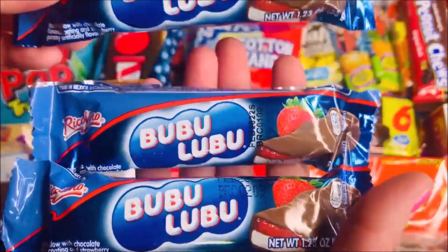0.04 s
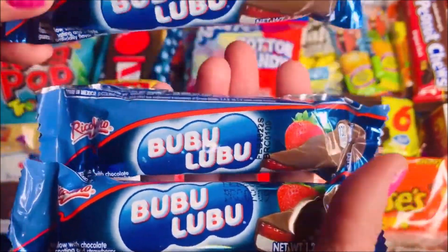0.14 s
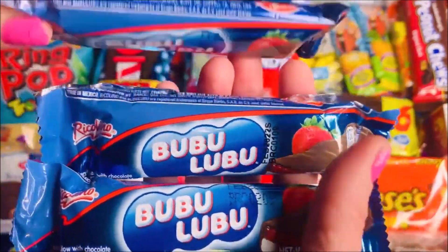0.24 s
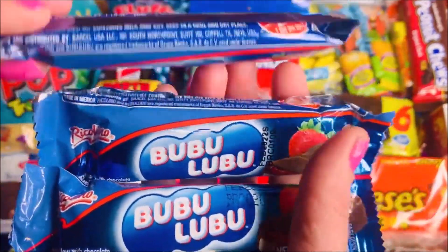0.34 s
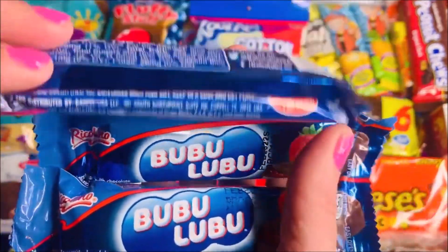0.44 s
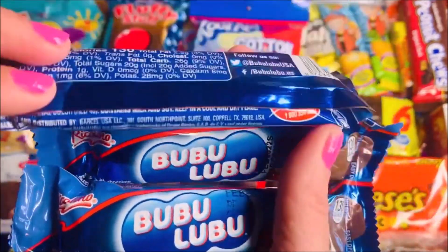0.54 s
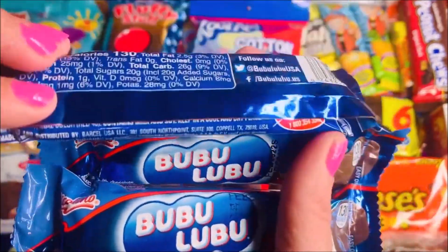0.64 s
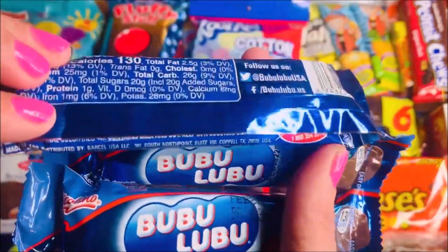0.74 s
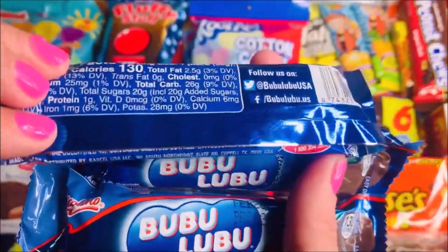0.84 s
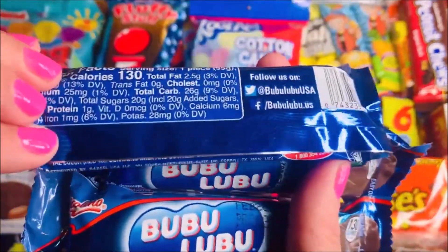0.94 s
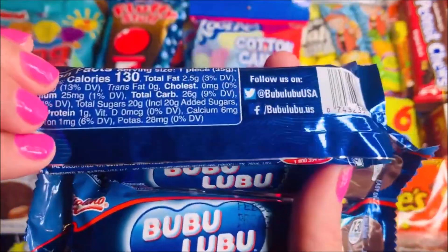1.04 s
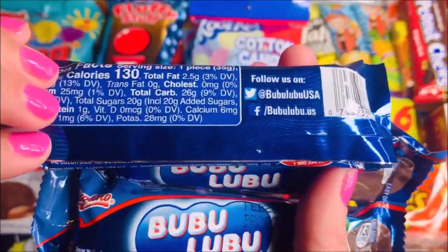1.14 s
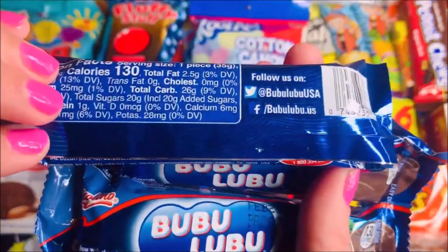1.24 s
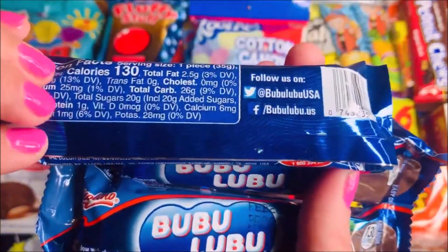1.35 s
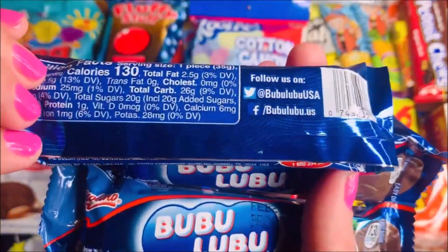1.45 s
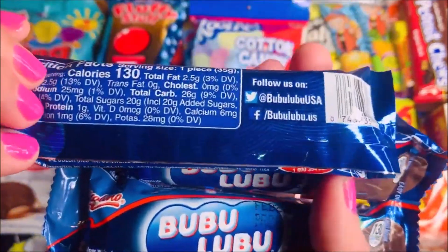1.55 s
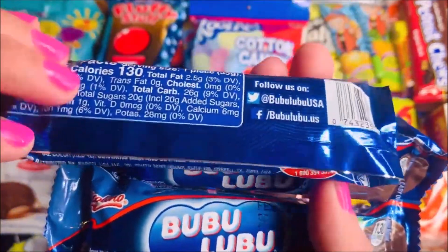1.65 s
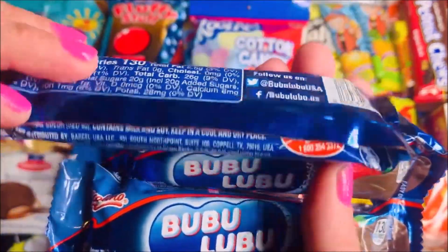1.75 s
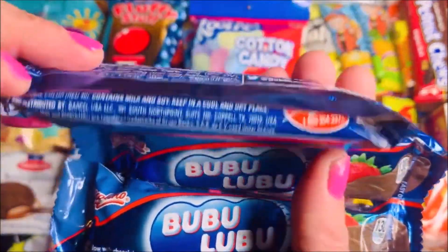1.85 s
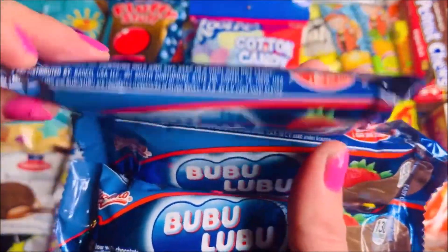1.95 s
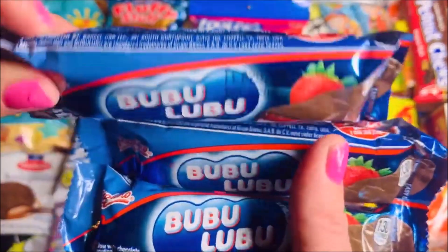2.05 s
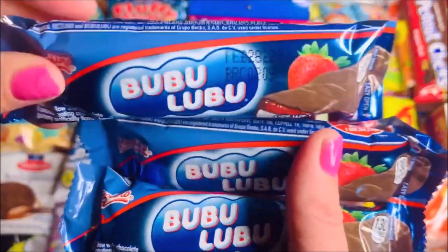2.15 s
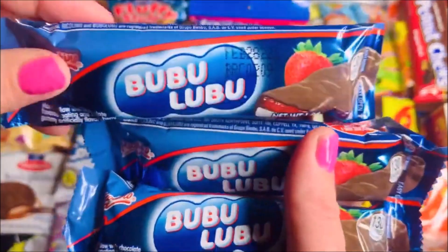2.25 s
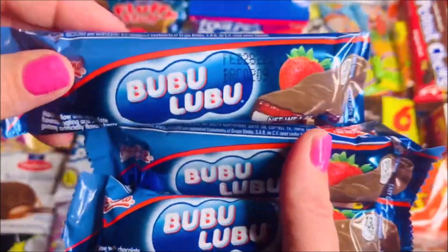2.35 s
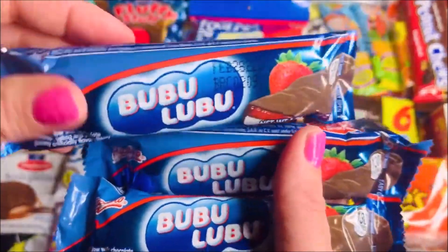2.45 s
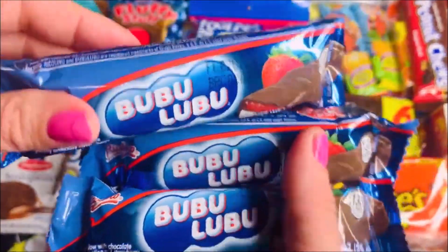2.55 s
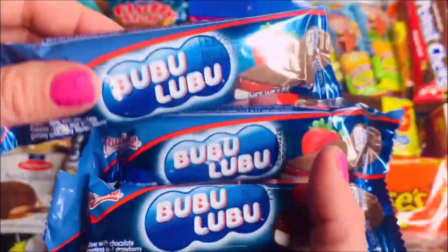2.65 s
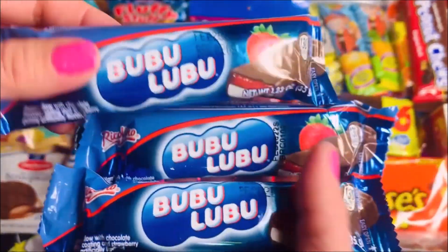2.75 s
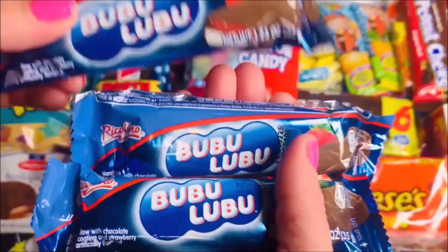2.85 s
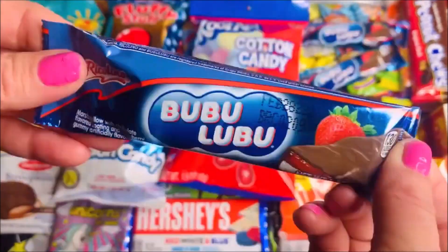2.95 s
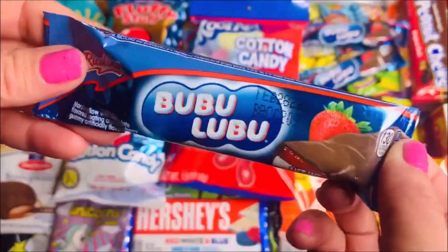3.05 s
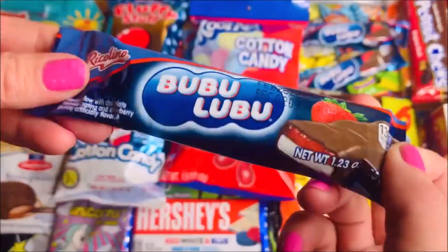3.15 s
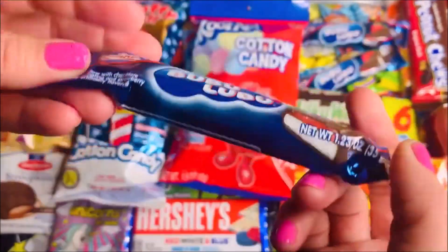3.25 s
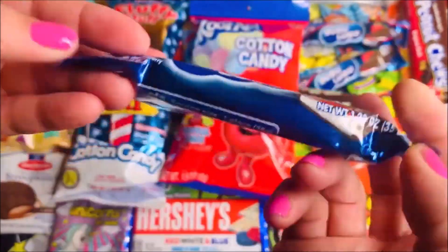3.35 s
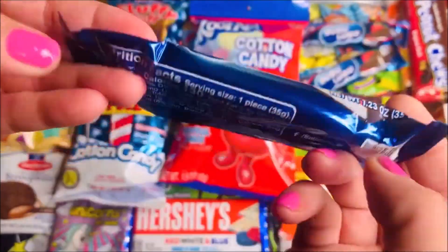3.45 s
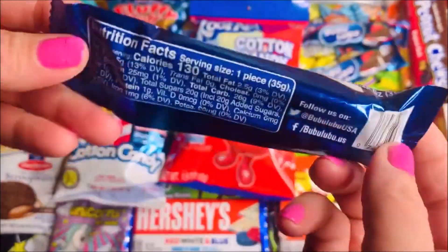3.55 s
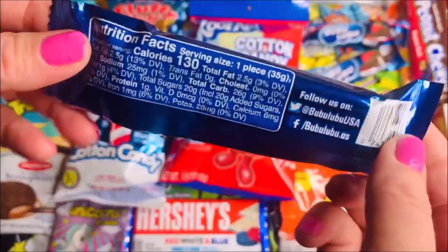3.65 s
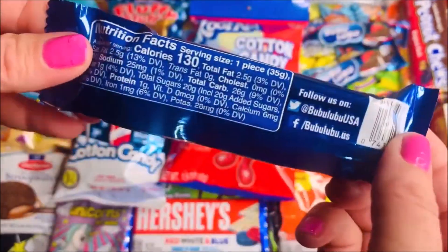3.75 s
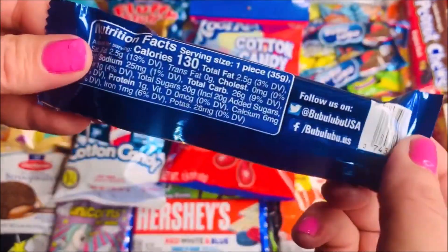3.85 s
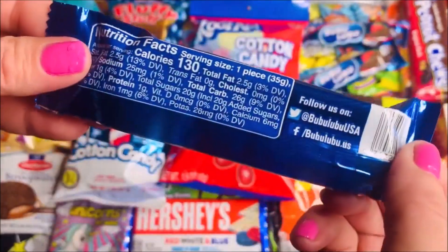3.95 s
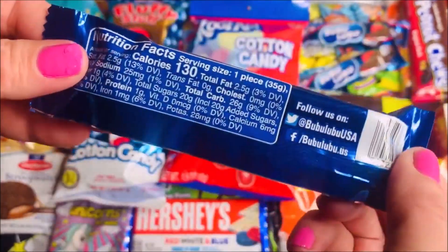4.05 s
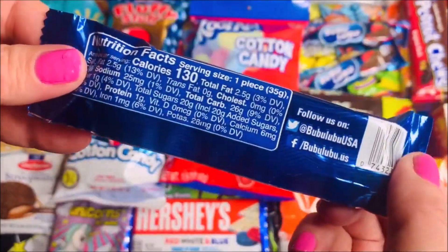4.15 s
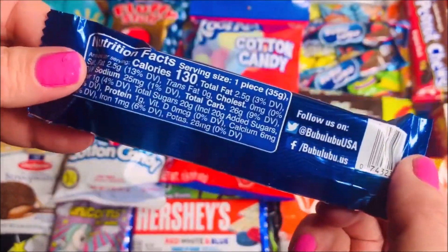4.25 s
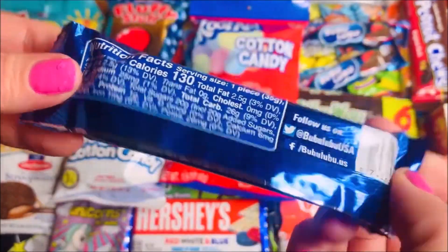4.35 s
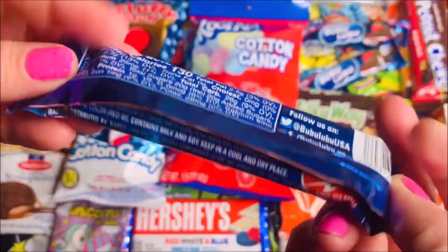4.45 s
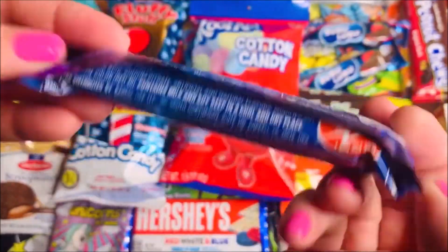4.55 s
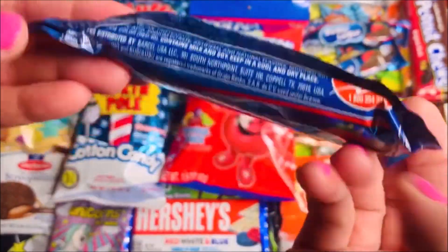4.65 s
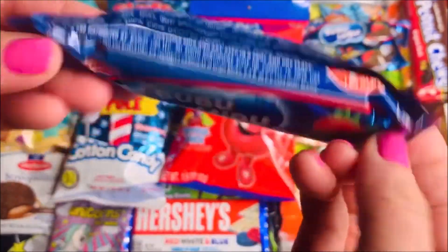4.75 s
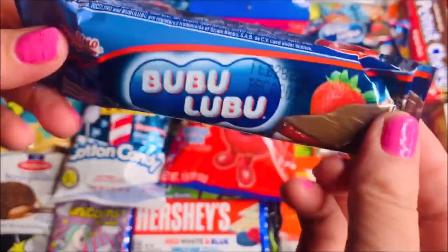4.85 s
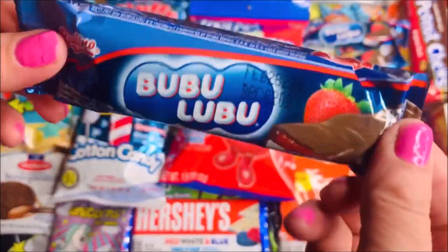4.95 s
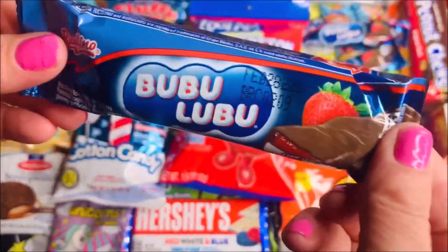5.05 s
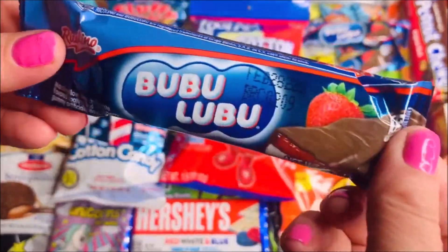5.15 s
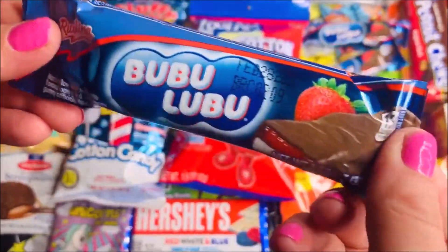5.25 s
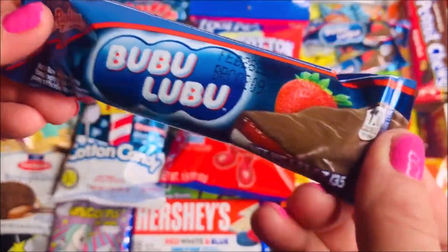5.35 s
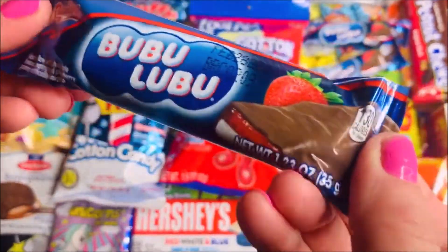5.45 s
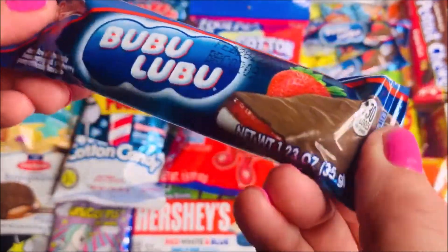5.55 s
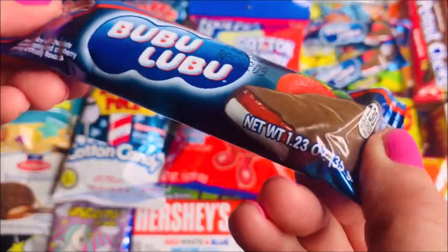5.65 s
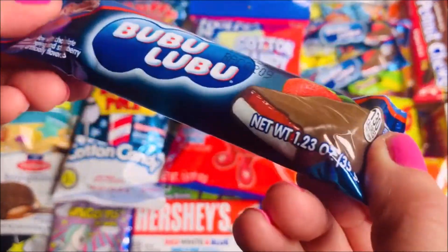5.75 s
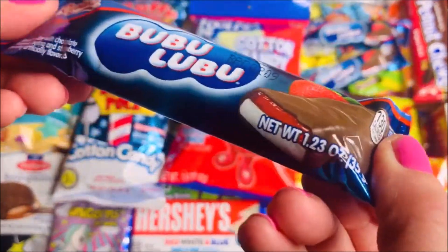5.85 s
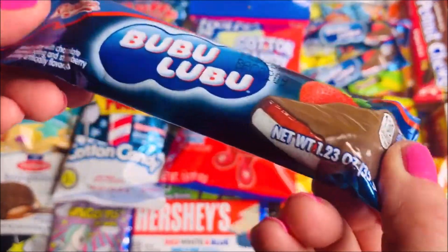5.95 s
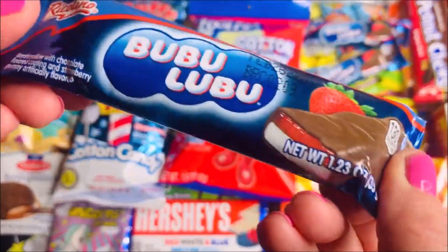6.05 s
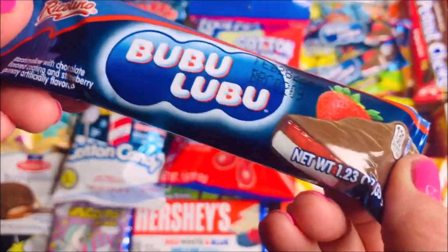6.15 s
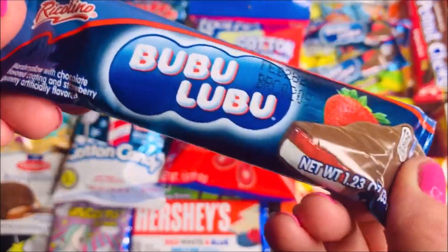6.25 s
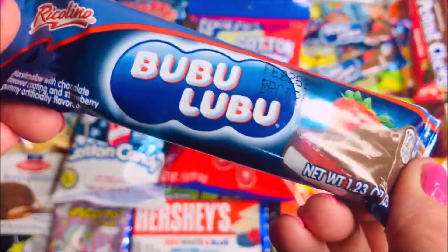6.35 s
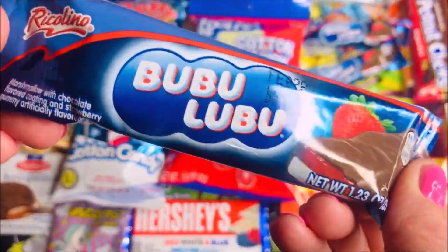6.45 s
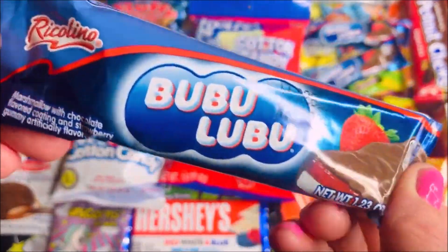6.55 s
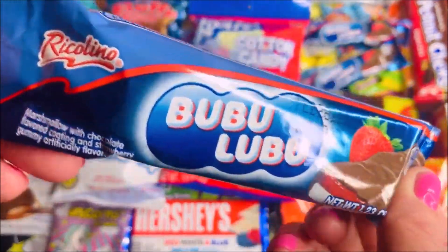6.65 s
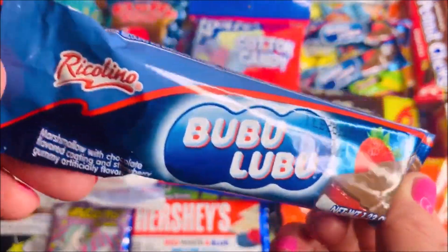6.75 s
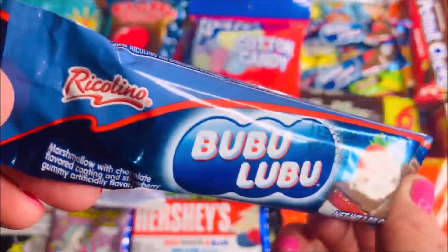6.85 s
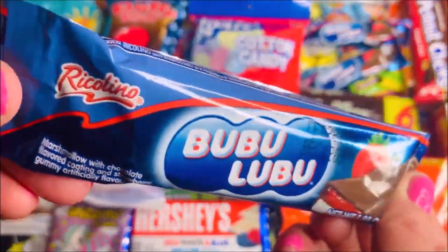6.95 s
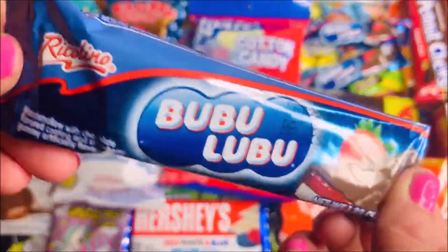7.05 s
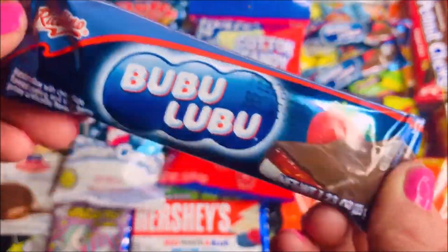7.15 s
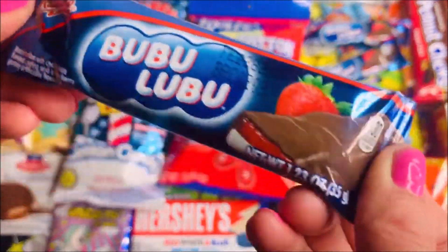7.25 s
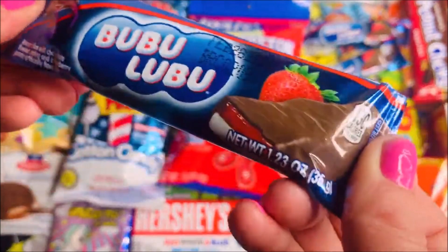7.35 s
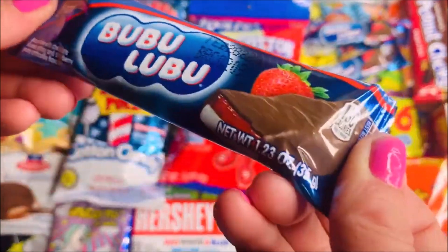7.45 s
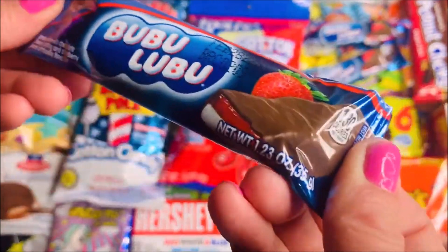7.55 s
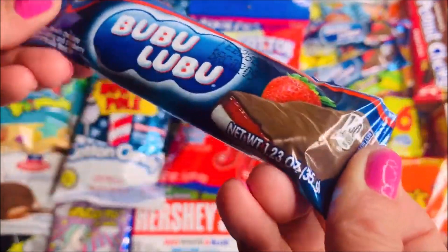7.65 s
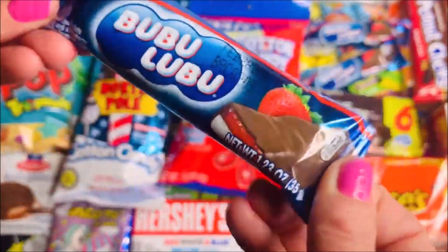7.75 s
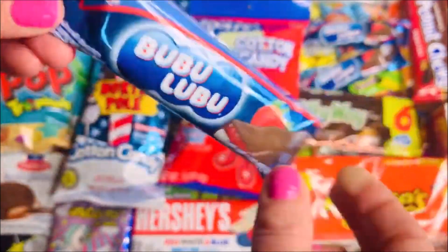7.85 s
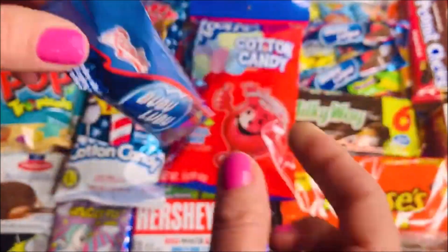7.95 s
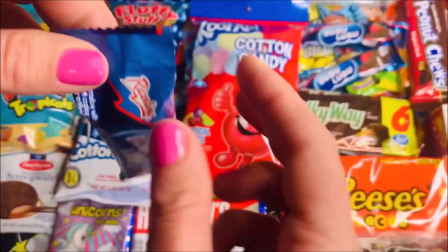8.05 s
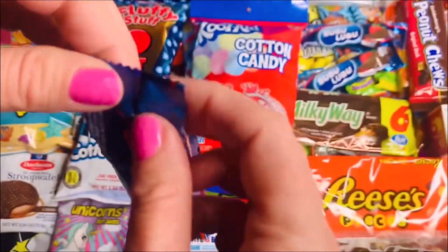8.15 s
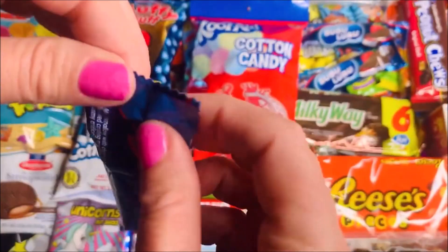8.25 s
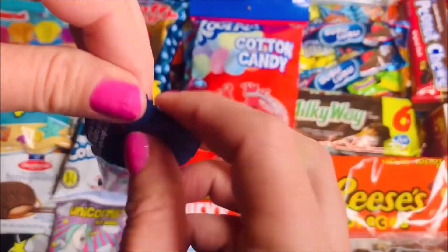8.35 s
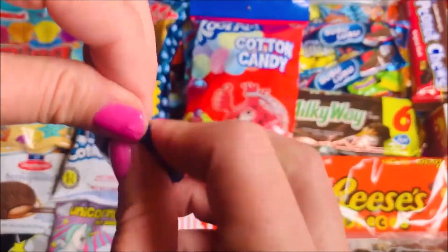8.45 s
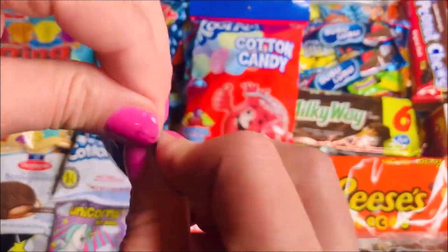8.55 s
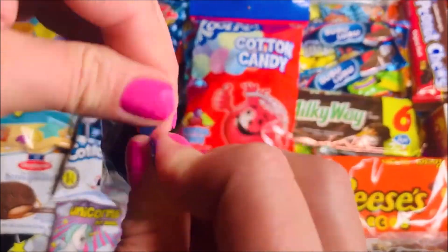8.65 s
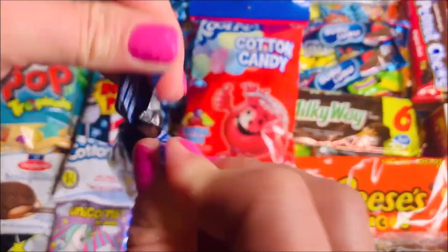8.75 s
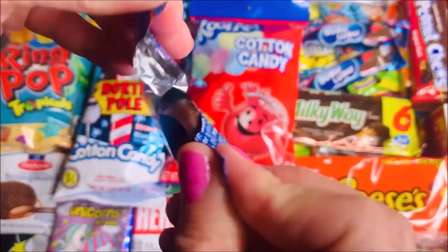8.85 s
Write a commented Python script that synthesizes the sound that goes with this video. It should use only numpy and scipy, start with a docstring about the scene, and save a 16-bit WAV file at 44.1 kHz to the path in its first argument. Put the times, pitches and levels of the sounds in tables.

```python
"""Stiff film on plastic-wrapped candy bars snaps and crackles as hands turn them close by.
Each crease gives way in quick slips that ring the film, an air pocket and a sharp edge.
Small ticks follow the snaps, with a fine rustle, small pops and soft sine knocks of the bars.
A small quiet room answers with close echoes and a short tail made of scattered clicks.
Behind it lie a faint low drone of wavering sines and a steady rumble and hiss of shaped noise."""
import sys
import numpy as np
from scipy import signal
from scipy.fft import rfft, irfft, next_fast_len
from scipy.io import wavfile
from scipy.ndimage import map_coordinates

SR = 44100
rng = np.random.default_rng(int(sys.argv[2]) if len(sys.argv) > 2 else 0)


def persist_wave(psi):
    """Save psi, clipped to +-1, as 16-bit WAV."""
    counts = np.round(np.clip(psi, -1, 1) * 32767).astype(np.int16)
    wavfile.write(sys.argv[1], SR, np.atleast_2d(counts).T)


N = 392049  # length in samples

# Creases that snap. A facet is a flat piece of film; levels are before the room and overall tone curve.
# Columns: start_s, facet_energy_db, facet_centre_hz, pocket_over_facet_db, pocket_centre_hz,
# edge_over_facet_db
CREASE_SNAPS = [(0.033, -29, 4530.0, 7, 2110, -10), (0.0862, -18, 4900, -14, 1970, -3.5),
                (0.1446, -28.0, 4520.0, 2.0, 2320, -3), (0.152, -20, 6620.0, -5, 2260, -3),
                (0.1755, -20, 4930.0, -4, 2640, -28.0), (0.218, -37.5, 3790.0, 16.5, 1920.0, -12.0),
                (0.2320, -12, 5700, -14, 2030, -2.5), (0.2715, -11.5, 5630, -14, 2620, 0),
                (0.3311, -24.5, 7150, -5, 2450, 2), (0.4555, -24, 4060, 0.5, 2170, -21.0),
                (0.5304, -20.5, 5730, -5, 2470, 4), (0.5973, -19, 5640, -23, 2600, -7),
                (0.695, -22.5, 5360, 4, 1980, -5), (0.7818, -29, 5160, -0.5, 2200.0, -4),
                (0.826, -26.5, 7000, -9, 2070.0, -1), (0.875, -29, 5570, -1.5, 2170, -7),
                (0.9229, -31, 5730.0, 0, 2530.0, -9.0), (0.9355, -8, 5670, -7.5, 2280, -5),
                (0.9734, -9.5, 5850, -39, 2720.0, -4), (1.0544, -21.5, 4880.0, 1.5, 2740, -9),
                (1.248, -36, 6140.0, 2.5, 2150, 1), (1.394, -33.5, 4050, 5.5, 1850, -36.0),
                (1.5134, -13.5, 6800, -1.5, 2420, -6), (1.6134, -16, 7640, -12, 2160.0, 2),
                (1.625, -22, 7940, -5, 1970.0, 0), (1.701, -18.5, 4300, -8, 2080.0, -23),
                (1.785, -20, 6000, -0.5, 2320, 3), (1.8493, -16, 6750, -5, 2440, -5),
                (1.8631, -22, 6030, -5.5, 2280, -8), (1.8890, -12.5, 6090.0, -7, 1830, 1),
                (1.924, -9.5, 6000, -2, 2630, 0.5), (2.0668, -9, 7400, -3.5, 2570, -4),
                (2.0848, -15, 5100, -15, 2560, 1.5), (2.208, -31, 6970.0, -2.5, 2100, 3),
                (2.2562, -28, 4340, 4, 2780, 2), (2.272, -23.5, 7100, -6.0, 2130, -24),
                (2.313, -22, 7020.0, -8.5, 1590, -0.5), (2.3347, -17, 7350, -8.5, 1750, 0),
                (2.476, -31.5, 6630.0, 4.5, 1850, -5), (2.5764, -13.5, 6640, -7.5, 1960, -4),
                (2.6195, -15.5, 7200, -11.5, 1880, 2), (2.641, -18.5, 7700, -2.5, 1860, 4),
                (2.679, -18, 5900, -7.5, 2700, -7), (2.7312, -29, 5560, 3, 2700, -17),
                (2.805, -25.5, 6460, -2.5, 2100, -10.0), (2.839, -23, 5760, -4, 2600.0, -1),
                (2.877, -10, 5250, -5, 2740, -3), (2.9033, -24.5, 3830.0, 7.5, 2330, -1),
                (2.936, -24, 5310.0, 4, 2640, -11), (2.9698, -24, 6920.0, -2, 2220.0, -5),
                (3.0133, -16, 5740, -12, 2260.0, -3.0), (3.026, -22, 5950.0, 6, 2840, 1),
                (3.1054, -15, 7030.0, -16, 2300.0, -15), (3.112, -20, 6510.0, 1, 2630, 9.5),
                (3.1185, -12.5, 7060, -12, 2320, -19), (3.143, -25.5, 5680.0, 8, 2500, -9),
                (3.1669, -19.5, 3880, 0, 2540, -19), (3.2178, -23.5, 5680.0, 0.5, 1540, -10.0),
                (3.234, -20.5, 7800, -0.5, 2240.0, 2.5), (3.2983, -15.5, 4660.0, -2.5, 2600, -7),
                (3.348, -26, 7130.0, 1, 2200.0, 6), (3.3752, -14.5, 6250, -4, 1980, -0.5),
                (3.43, -22, 7060, -26, 2020.0, 6), (3.4677, -18, 5600, -3.5, 1580, -9.0),
                (3.5165, -12, 6900.0, -7, 2310, -5), (3.57, -27, 5150, 0.5, 1720.0, -12),
                (3.649, -26, 5000, 1, 1780, -3), (3.6712, -18.5, 5040, 2, 2100, -3),
                (3.7372, -30, 5730.0, 3.5, 2110.0, -9), (3.8763, -26, 6830, -4, 2470.0, -6),
                (3.8953, -18.5, 5900, 0, 2510, 1), (4.0147, -22, 4500, -1, 2170, -15),
                (4.0869, -16, 6500, -6.5, 1950, 2.5), (4.2812, -11.5, 6070, -7.5, 1840, -2),
                (4.302, -3.5, 5540, -6.5, 2440, -3.5), (4.3478, -5.5, 6700, -9, 2200, -3.5),
                (4.379, -12.0, 5630, -3.5, 2460.0, 0), (4.481, -24, 5820.0, -3, 2370.0, -3),
                (4.5039, -15, 6960, -5, 2610, -2.5), (4.567, -26, 4840.0, 5, 2140, -13),
                (4.5918, -15, 6960, -5, 2350, -5), (4.625, -6.5, 4350, -4.5, 2700, -9),
                (4.644, -31, 4820.0, 5, 2320.0, 9), (4.7418, -9, 7700, -10.5, 2150, -24),
                (4.754, -7, 7700, -31, 2220.0, 2.5), (4.7914, -9.5, 5860, -10.5, 2300, -2),
                (4.8160, -9, 7350, -7, 2400, 4), (4.8308, -13.5, 4900, -5.5, 2020, -12),
                (4.92, -17.5, 5870, -19, 2140.0, -4), (4.9439, -14.5, 6030, -7, 2110.0, -1),
                (4.9516, -12.5, 6870.0, -9, 2200.0, 7), (5.0196, -15.5, 5160, -1.5, 2770, -4.5),
                (5.0529, -15, 6300, -5, 2370, -8), (5.1236, -20.5, 8300, -2.5, 2720, 4.5),
                (5.2396, -19.5, 4400, -4, 1550, -21), (5.282, -23, 5400, -26, 1860.0, -6),
                (5.3808, -23.5, 3900, -1.5, 2690, -21), (5.5684, -43, 5130, 10, 1460.0, -16),
                (5.7377, -38.5, 3560, 8, 2250, -18), (5.769, -36, 3660.0, 5.5, 2360.0, -28.0),
                (5.779, -25, 5300, -3, 1880, -30), (5.8522, -34, 3630, 1, 2120, -26),
                (5.9387, -17.0, 5540, -1, 1610, -13), (5.9602, -9.5, 5200, -6, 1750, -6),
                (6.0522, -15.5, 6000, -11, 2320, -8.5), (6.124, -22, 5500, -8, 1670, -6),
                (6.3647, -41, 4260, 5, 2480, -20.0), (6.4233, -31, 6870, -32, 1620.0, -7.0),
                (6.433, -24.5, 5670, -1.5, 1890, -2.5), (6.5652, -7.5, 6250, -9.5, 2540, -5.5),
                (6.7091, -46, 5170.0, 3, 1920.0, -14), (6.8674, -26, 3740, 4.5, 2400, -12),
                (6.991, -21, 5800, -5, 1720, -18), (7.0317, -12.5, 7200, -10, 2120.0, -12.0),
                (7.0538, -31, 7170.0, -12, 2180.0, 2), (7.0805, -20.5, 5660.0, -4.5, 2200.0, 0),
                (7.1387, -22, 5690.0, -5, 2090.0, -8), (7.1824, -18, 8600, -7, 2230, 4),
                (7.298, -28, 3740, -3.5, 1750, -6), (7.444, -33, 3930.0, 4, 1940, -18),
                (7.4617, -28, 4800, -3, 2200, -24.0), (7.4761, -24, 5700, -1, 2250, -8),
                (7.4966, -27, 4690.0, 2.5, 2130, -20), (7.539, -44, 4000, 15, 1290, -15),
                (7.5565, -17, 5230, 1.5, 1850, -24), (7.6301, -13, 6840, -9, 1990, -4),
                (7.671, -20.5, 5070.0, -2.5, 2230, -10.0), (7.6955, -16, 5200, -4.5, 1700, -12.0),
                (7.7248, -5, 6370, -7.5, 2200, -1), (7.7515, -13.5, 7450, -24, 2100.0, -4),
                (7.877, -15.5, 5200, -25, 2570, -7), (7.89, -15, 5530, 3.5, 2000, -3),
                (7.8998, -15.5, 6000, -13, 2400, -1.5), (7.9054, -11, 7000, -7.5, 2650, -16),
                (7.9588, -22, 4700, -4.0, 2160, -11.0), (7.999, -12, 6200, -10, 2140, -0.5),
                (8.037, -33, 5000, 5, 1880, 4), (8.0862, -38, 5830, 0.0, 1970.0, -12),
                (8.101, -20, 6380.0, 2, 1800, -6), (8.1812, -18.0, 6200, -1, 1820, -0.5),
                (8.2492, -23.5, 5560.0, -5, 2420.0, -2), (8.2948, -6, 5440, -9, 2660, -8),
                (8.331, -12, 6360, -3.5, 2560, 1.5), (8.397, -5.5, 6340, -30, 2550, -4.5),
                (8.4897, -28.5, 7630.0, -14.0, 2030.0, 16), (8.498, -5, 7600, -6, 1760, -21),
                (8.5274, -6, 8500, -18, 2500, 3.5), (8.54, -15, 6200, -19, 2120.0, -4),
                (8.561, -14, 6270.0, 0, 1920, -9.0), (8.5741, -14, 5700.0, -5, 2280.0, -6),
                (8.623, -19.5, 4300, 4, 1770, 6), (8.627, -15.5, 6640.0, 0.5, 1900, -10),
                (8.6371, -10, 6000, -21, 1990.0, -1.5), (8.657, -19, 7110.0, -16, 2110.0, 4),
                (8.6749, -24.5, 4610.0, 2, 1500, -2), (8.685, -9, 5950, -4.5, 1810, -5),
                (8.708, -29.5, 4490.0, 6.5, 2390, -7.0), (8.75, -13, 5670, 5.5, 1940, 0),
                (8.7997, -12.5, 6900, -1.5, 1970, 2), (8.83, -7.5, 6230, -5.5, 2480, -1),
                (8.8583, -10, 5780.0, -3, 2450.0, -5), (8.871, -17, 6030, -9, 2750, -7)]
# Tone balance of the quiet room's noise. Columns: pitch_hz, relative_level_db (per Hz)
AIR_SPECTRUM = [(12, -50), (20, -5), (60, -9.5), (151, -1.5), (237, -13.5), (361, -11.5), (888, -27.5),
                (1510, -26), (4790, -42), (15200, -47), (16500, -54)]
AIR_LEVEL_DB = -59.5  # overall rms level before the overall tone curve
# Tones of the lasting drone, gliding from 1 s before the scene to 1 s after it.
# Columns: start_pitch_hz, end_pitch_hz, typical_rms_level_db, waver_rms_hz
DRONE_TONES = [(55.7, 59, -74.5, 1.5), (120, 118, -62, 2.27), (147.3, 141, -58, 0.79),
               (152.3, 153, -69.5, 3.53), (181.2, 160, -68, 1.7), (215.6, 209, -73.5, 2.26)]
# Time for the room's tail to fall 60 dB. Columns: pitch_hz, fall_time_s
ROOM_DECAY = [(500, 0.21), (1500, 0.16), (3500, 0.24), (6000, 0.2), (10000, 0.17), (13500, 0.08),
              (16000, 0.031)]
# Single echoes off the table and walls. Columns: nominal_delay_ms, level_db
CLOSE_ECHOES = [(2.4, -15), (4.6, -12), (8.6, -12)]
# Overall tone colour: slightly bright, falling steeply above 15.7 kHz. Columns: pitch_hz, gain_db
OVERALL_TONE = [(20, -1.5), (13500, 4), (15700, -2.5), (16000, -19), (17000, -43)]
TOP_EDGE_HZ = 16900  # the final filter removes sound above about here
PLACES = 8  # places on the film, each with its own room answer
# Soft knocks of the bars against fingers and each other.
# Columns: start_s, level_before_fade_db, pitch_hz
BAR_KNOCKS = [(0.694, -48, 740), (2.623, -44, 514), (2.874, -38, 342), (3.518, -40.5, 292),
              (3.672, -37.5, 337), (4.279, -33.5, 303), (4.829, -38, 477), (8.626, -38, 730)]
# Thin tones that sink, come and go.
# Columns: start_s, end_s, start_pitch_hz, end_pitch_hz, typical_rms_level_db
THIN_TONES = [(.8, 3.1, 339, 331, -70), (3.4, 7.3, 323, 313, -67), (5.1, 6.9, 285, 282, -69)]
# How busy the hands are; this scales the rustle and small pops. Columns: time_s, relative_level_db
HAND_ACTIVITY = [(0.0, -56.5), (0.99, -58.5), (1.36, -66.5), (1.78, -51.5), (2.28, -54.5), (3.04, -48),
                 (3.62, -50), (4.33, -79), (4.48, -51.5), (4.93, -52.5), (5.59, -75.5), (5.89, -68.5),
                 (6.91, -79), (7.1, -53.5), (7.45, -69), (7.77, -52), (8.24, -52), (8.74, -52)]


def gain_of(db):
    """Turns decibels into a multiplier for the wave."""
    return 10 ** (np.asarray(db) / 20)


def evened(x):
    """Scales a signal to an rms level of 1."""
    return x / np.sqrt(np.mean(x ** 2) + 1e-20)


def read(points, hz):
    """Reads a curve between its points, along a logarithmic pitch scale."""
    point_hz, value = np.transpose(points)
    return np.interp(np.log(hz + 1), np.log(point_hz + 1), value)


def add(mix, start_s, sound):
    """Adds a sound at its start time, cutting off what runs past the end."""
    part = mix[round(start_s * SR):][:len(sound)]
    part += sound[:len(part)]


def coloured(x, points):
    """Makes each pitch stronger or weaker, following a curve of gains in dB."""
    size = next_fast_len(len(x))
    gain = gain_of(read(points, np.fft.rfftfreq(size, 1 / SR)))
    return irfft(rfft(x, size) * gain, size)[:len(x)]


def air():
    """Steady rumble and hiss of the quiet room: random noise with a shaped tone balance."""
    noise = coloured(rng.standard_normal(N), AIR_SPECTRUM)
    return gain_of(AIR_LEVEL_DB) * evened(noise)


def drift(per_s):
    """A slow random curve of rms 1, drawn smoothly through per_s random points a second."""
    knots = rng.standard_normal(int(N / SR * 40) + 2)
    position = np.arange(N) / SR * min(per_s, 40)
    return evened(map_coordinates(knots, [position], order=3))


def tone(start_hz, end_hz, db, waver_hz, start_s=-1, end_s=N / SR + 1):
    """A low sine whose pitch glides and wavers while its level swells a little."""
    t = np.arange(N) / SR
    present = np.clip(np.minimum(t - start_s, end_s - t) / .3, 0, 1)  # 0.3 s fades
    pitch_hz = np.interp(t, [start_s, end_s], [start_hz, end_hz]) + waver_hz * drift(8)
    turns = np.cumsum(pitch_hz) / SR
    level = gain_of(db + 1.44 * drift(6.4))
    return present * level * np.sqrt(2) * np.sin(2 * np.pi * turns)


def hum():
    """The lasting drone and the thin tones above it, built by adding separate sines."""
    thin = sum(tone(*row, .15, start_s, end_s) for start_s, end_s, *row in THIN_TONES)
    return sum(tone(*row) for row in DRONE_TONES) + thin


def room(x):
    """Close single echoes, a quick scatter off nearby things, and a tail whose bands die at their own speeds."""
    # One click of random sign falls somewhere in every 20 samples.
    clicks = np.zeros(SR // 2)
    at = np.arange(44, SR // 2 - 20, 20)
    clicks[at + rng.integers(0, 20, len(at))] = rng.choice([-1., 1.], len(at))

    hz, t, bands = signal.stft(clicks, SR, nperseg=128)
    fade = gain_of(-60 * t / read(ROOM_DECAY, hz)[:, None])
    tail = signal.istft(bands * fade, SR, nperseg=128)[1]

    scatter_fade_db = -60 * np.arange(len(clicks)) / SR / 0.021  # falls 60 dB in 21 ms
    scatter = clicks * gain_of(2.76 * rng.exponential(1, len(clicks)) + scatter_fade_db)

    answer = gain_of(-3.0) * tail[:len(clicks)] / np.linalg.norm(tail)
    answer += gain_of(-11) * scatter / np.linalg.norm(scatter)
    for (ms, db), shift in zip(CLOSE_ECHOES, rng.uniform(.8, 1.15, len(CLOSE_ECHOES))):
        add(answer, shift * ms / 1000, gain_of([db]))
    return signal.oaconvolve(x, answer)[:N]


def knocks():
    """Each knock is one dull, short sine with a soft start, falling 60 dB in 25 ms."""
    out = np.zeros(N)
    t = np.arange(round(.05 * SR)) / SR
    for start_s, db, hz in BAR_KNOCKS:
        level = gain_of(db - 60 * t / 0.025) * np.minimum(t * hz, 1)
        add(out, start_s, level * np.sin(2 * np.pi * hz * t))
    return out


def ring(hz, decay_ms, turn):
    """A part of the pack rings and dies: a fading sine that rises over its first cycle."""
    t = np.arange(round(.012 * SR)) / SR
    level = np.exp(-1000 * t / decay_ms) * np.minimum(t * hz, 1)
    return level * np.sin(2 * np.pi * (hz * t + turn))  # turn: where in its cycle the sine starts


def snap(db, facet_hz, pocket_db, pocket_hz, edge_db, chance):
    """A crease gives way in a few quick slips; each slip rings the facet, the air pocket and the sharp edge."""
    parts = np.zeros((3, round(.02 * SR)))
    for k, (wait, size, a, b, c, d, turn) in enumerate(chance):
        facet = ring(facet_hz * (0.87 + 0.29 * a), 0.24, turn)
        facet += 0.49 * ring(3200 + 5500 * b, 0.36, turn)
        pocket = ring(pocket_hz * (0.85 + 0.47 * c), 0.4, turn)
        pocket += 0.18 * ring(750 + 700 * d, 0.86, turn)
        edge = ring(9500 + 2500 * d, 0.12, turn) + ring(12000 + 3600 * b, 0.12, turn)

        slip_s = .00032 * (k + wait - .5) * (k > 0)  # the first slip comes at once
        slip_gain = gain_of(-8 * size - 3 * k)  # later slips tend to be weaker
        for part, sound in zip(parts, (facet, pocket, edge)):
            add(part, slip_s, slip_gain * sound)
    even_parts = parts / np.linalg.norm(parts, axis=1)[:, None]  # equal energy before mixing
    return gain_of(db) * gain_of([0, pocket_db, edge_db]) @ even_parts


def crackle():
    """The film settles in small ticks after each snap; busy hands add a fine rustle and scattered small pops."""
    jolts = np.zeros(N)
    for start_s, db, *_ in CREASE_SNAPS:
        add(jolts, start_s, gain_of([db]))
    # Strain jumps at each snap, then dies away with a time constant of 0.03 s.
    strain = signal.lfilter([1], [1, -np.exp(-1 / (0.03 * SR))], jolts)
    busy = gain_of(np.interp(np.arange(N) / SR, *np.transpose(HAND_ACTIVITY)))

    out = np.zeros((PLACES, N))
    # Twenty grain sounds, each made of two slips and repeated at random moments.
    for k, chance in enumerate(rng.random((20, 2, 10))):
        # Average counts per second for each grain: 8 ticks, 30 rustle grains, 2.5 small pops.
        ticks = (rng.random(N) < 8 / SR) * gain_of(3.5 * np.minimum(rng.exponential(1, N), 3))
        rustle = (rng.random(N) < 30 / SR) * rng.laplace(size=N)
        small_pops = (rng.random(N) < 2.5 / SR) * gain_of(2.5 * np.minimum(rng.exponential(1, N), 3))
        settling = gain_of(-22) * strain * ticks
        handling = busy * (gain_of(3.0) * rustle + gain_of(15.5) * small_pops)

        a, b, c = chance[0, 7:]
        grain = snap(0, 3500 + 250 * k, -13 + 14 * a, 1300 + 1400 * b, -10 + 11 * c, chance[:, :7])
        out[k % PLACES] += signal.oaconvolve(settling + handling, grain)[:N]
    return out


def creases():
    """The snaps that stand out, each five slips of a crease at one of a few places on the film."""
    out = np.zeros((PLACES, N))
    chances = rng.random((len(CREASE_SNAPS), 5, 7))
    for k, ((start_s, *shape), chance) in enumerate(zip(CREASE_SNAPS, chances)):
        add(out[k % PLACES], start_s, snap(*shape, chance))
    return out


def scene():
    """Film and knocks sound directly and through the room; the background is added as it is."""
    background = air() + hum()
    film = crackle() + creases()
    film[0] += knocks()
    return (sum(place + room(place) for place in film) + background)[None]


def record(dry):
    """An overall tone curve colours the sound; a filter then limits the band."""
    toned = coloured(dry[0], OVERALL_TONE)[None]
    band_limit = signal.firwin(511, TOP_EDGE_HZ, window=("kaiser", 9), fs=SR)
    return signal.oaconvolve(toned, band_limit[None], "same")


dry = scene()
out = record(dry)
persist_wave(out)
```